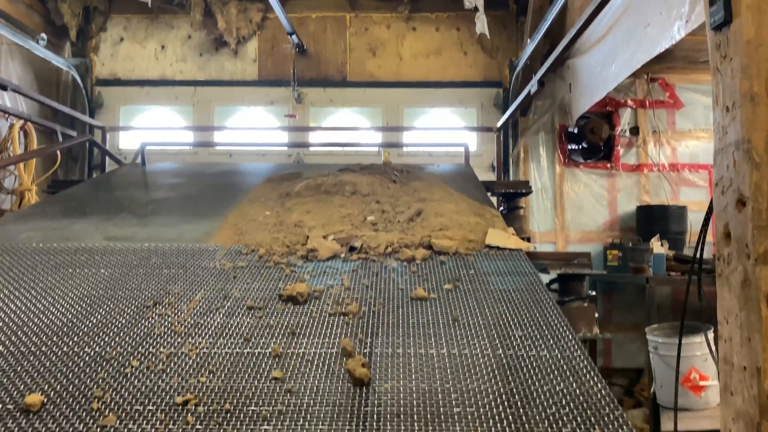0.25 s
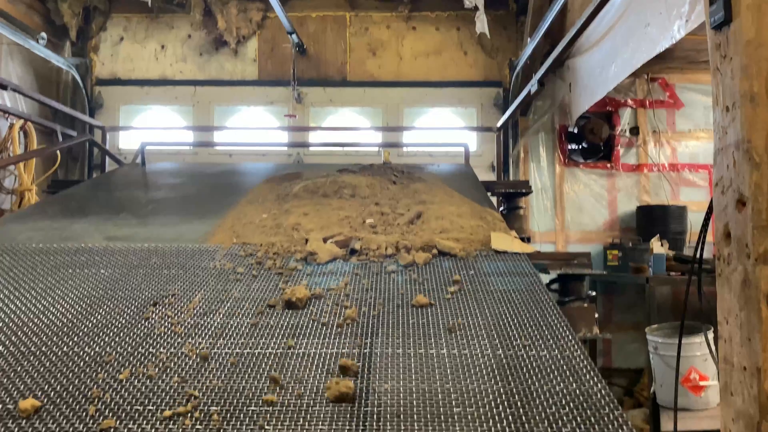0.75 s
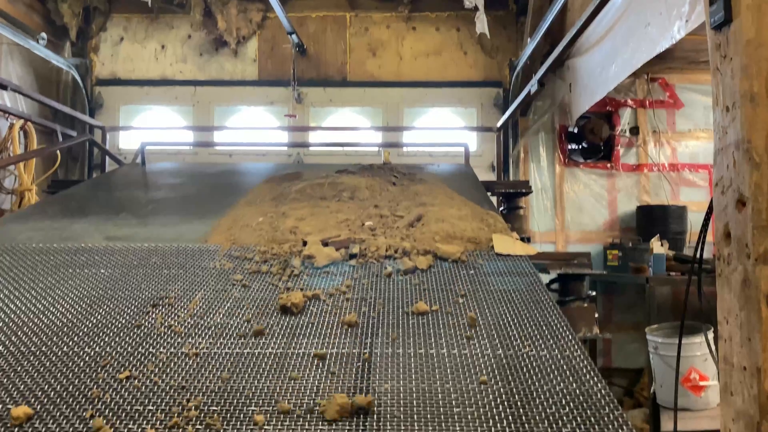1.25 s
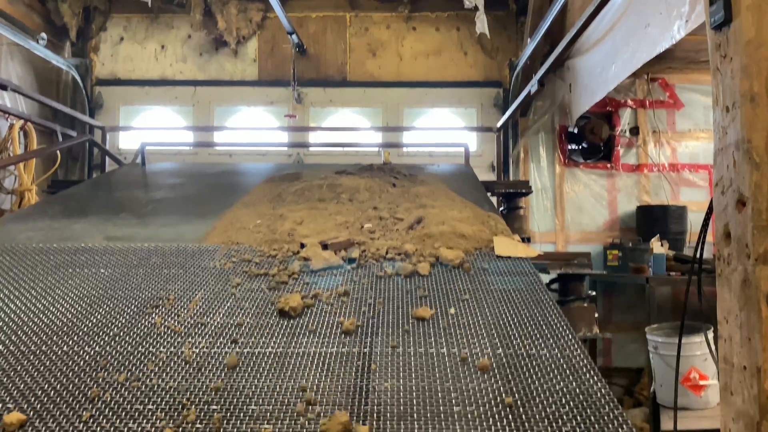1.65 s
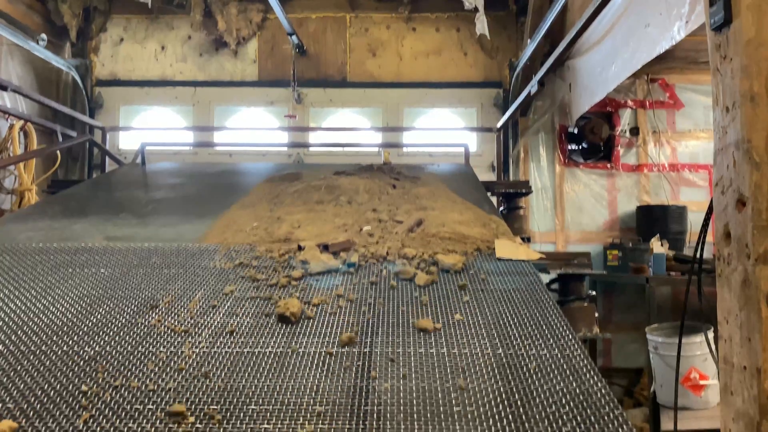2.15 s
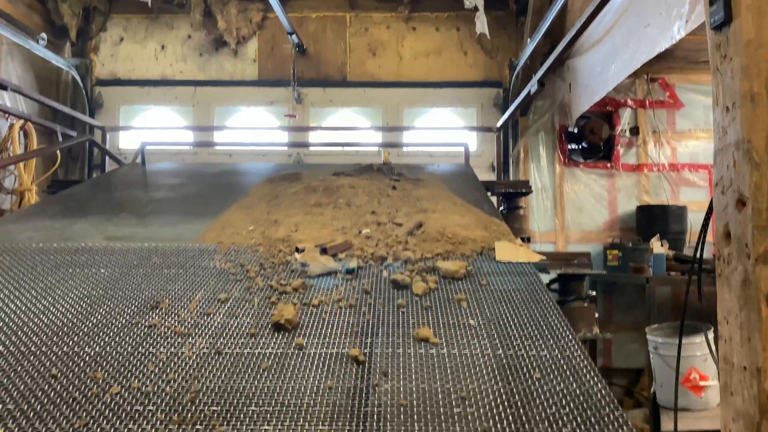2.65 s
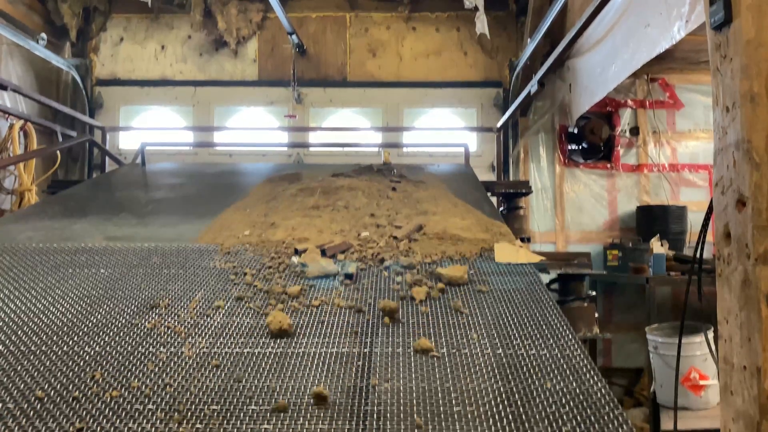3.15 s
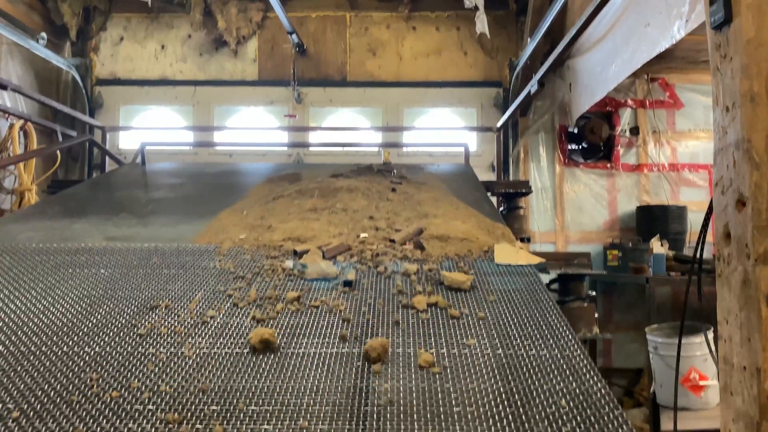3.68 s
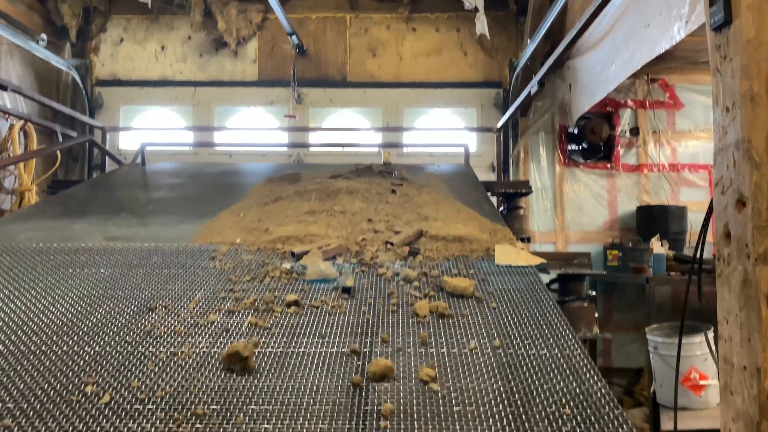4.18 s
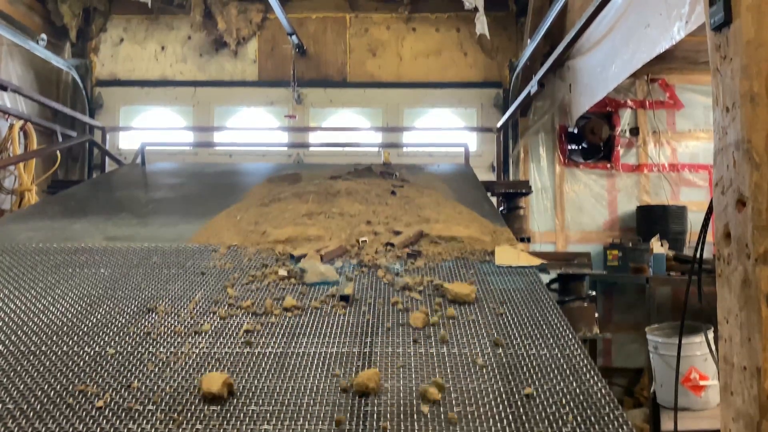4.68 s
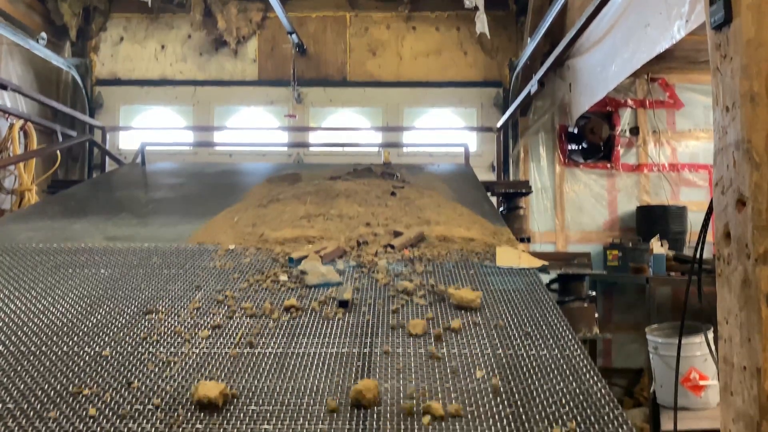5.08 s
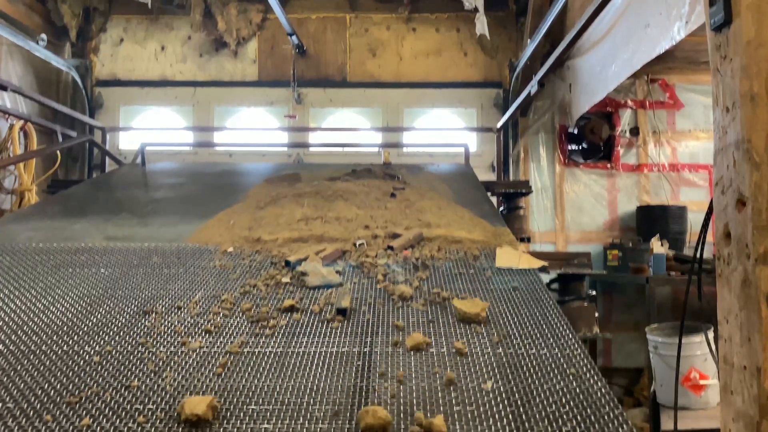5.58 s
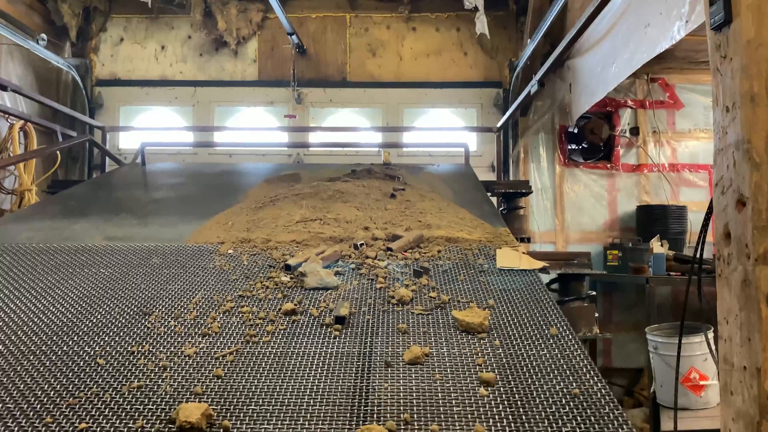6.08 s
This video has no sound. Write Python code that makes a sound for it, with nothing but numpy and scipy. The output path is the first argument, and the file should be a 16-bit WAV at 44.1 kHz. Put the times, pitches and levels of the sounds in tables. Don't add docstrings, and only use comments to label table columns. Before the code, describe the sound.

In a workshop, an unbalanced motor shakes a steel mesh screen, heard very close in stereo. A rough, low buzzing knock of about twenty-four beats a second merges with dense, gritty rattling of gravel and wires. The drone sags slightly, brightens as dirt sheds, then runs steadily. Near the end shaking stops, leaving a soft low wobble and a short fading ring.

```python
import sys
import numpy as np
from scipy import signal
from scipy.io import wavfile
from scipy.ndimage import uniform_filter1d

SR = 44100
rng = np.random.default_rng(int(sys.argv[2]) if len(sys.argv) > 2 else 0)


def volts_from_db(level):
    exponent = np.asarray(level, float) / 20
    return 10 ** exponent


def master(y):
    cut = np.clip(np.atleast_2d(y).T, -1, 1)
    pcm = np.round(cut * 32767)
    wavfile.write(sys.argv[1], SR, pcm.astype(np.int16))


N = 279153

# order (multiple of the bounce rate), left level under load/dB,
# left level once freed/dB, right level once freed/dB
KNOCK_ORDERS = [(2, -41, -41, -39), (3, -56, -51, -51), (4, -35, -30.5, -36), (5, -32.5, -31, -44),
                (6, -29, -26.5, -41), (7, -36, -34, -49), (8, -28, -31.5, -48), (9, -37, -41, -45),
                (10, -42, -38.5, -41), (12, -39, -37, -43), (13, -44, -41, -47), (14, -40, -45, -51),
                (15, -37, -39, -43), (16, -33, -34, -43), (17, -41, -39, -44), (18, -38, -34, -46),
                (19, -45, -39, -43), (20, -32, -27.5, -41), (21, -32, -32, -40), (22, -30, -31, -46),
                (23, -37, -38, -47), (24, -35, -34, -48), (26, -29.5, -28.5, -50), (27, -38, -37, -46),
                (28, -29, -42, -50), (30, -33, -33.5, -46), (36, -37, -42, -51), (38, -37, -37, -43),
                (40, -37, -41, -47), (50, -49, -37, -49)]
HALF_BLOW_ORDERS = (8, 20, 22, 24, 30, 38, 40)
# t/s, level/dB
SHAKE = [
    (0, -.3),
    (1.2, -0.44),
    (1.6, 0.6),
    (2.2, 0),
    (3.4, 1),
    (4.4, 0),
    (5.5, -0.6),
    (5.8, -1.9),
]
# t/s, turns per second above nominal
SHAFT_DRIFT = [(0, -.238), (.6, -.093), (1.05, -.57), (1.5, -.504), (2.15, .257), (2.9, .201), (3.3, .13),
               (4.15, .154), (4.5, -.002), (5.05, .023), (5.4, .114)]
# f/Hz, left level/dB per Hz, right level/dB per Hz
RATTLE_SPECTRUM = [(40, -81, -78), (81, -61.5, -65), (172, -54, -67), (244, -63.5, -64.5),
                   (523, -52.5, -70), (756, -53, -62), (1370, -56.5, -71), (2360, -59.5, -78),
                   (3770, -58, -75.5), (5040, -63, -85), (6550, -71.5, -79.5), (8440, -80, -84),
                   (9650, -77, -78), (13260, -90, -90.5)]
# f/Hz, width/Hz, left level/dB, right level/dB
MESH_MODES = [(68, 16, -3, -6), (377, 34, 6.5, 0), (520, 27, 4, 18.5), (617, 40, 6, -8), (890, 62, -0.5, 6),
              (1080, 16, 5, 18), (1440, 25, 0, 9.5), (2050, 14, 2, -7), (2232, 14, 1.5, 16),
              (2526, 39, 3.5, 13), (3900, 670, 0.5, 2), (5170, 510, 1.5, 3)]
# f/Hz, likeness 0-1
PORT_LIKENESS = [(150, 0.99), (220, 0.63), (340, 0.5), (500, 1), (680, 0.05), (950, 0.9), (1350, 1),
                 (1900, 0.66), (2400, 1), (3100, 0), (4000, 0.43), (4750, 0.5), (6500, .7), (9000, 0.93)]
# f/Hz, phase/rad
PORT_LEAD = [(100, 2.7), (130, 3.5), (170, 3.8), (200, 4.6), (280, 6.8), (520, 6.4), (750, 3.2),
             (1000, 2.3), (1700, 1.0), (2100, -1.6), (3000, -3.0), (3300, .3), (4600, 0), (5000, 2.3)]
# t/s, level/dB, f/Hz, t60/s
SPRING_SWINGS = [
    (5.8, -28, 52, 0.65),
    (5.92, -30.5, 75, 0.29),
    (6.091, -50, 111, .4),
    (6.13, -32, 55, 0.24),
    (6.27, -39, 100, 0.24),
]

SHAFT_HZ = 48.5
PATH_S = 11.88 / 44100
EDGE_HZ = 15200
FREED_S, FREEING_S = 1.79, 0.19
LOADED_ODD_DB = -5
MISSED_S, MISSED_WIDTH_S, MISSED_DB = 1.07, .33, -9
KNOCK_SHARE, LOW_SHARE, MID_SHARE, HIGH_SHARE = 0.95, 0.27, 0.52, 0.67
STOP_S, RELEASE_S = 5.815, .035
KNOCK_DROP_DB, LOW_DROP_DB, MID_DROP_DB, HIGH_DROP_DB = -5, -4, -4.5, -3.5
SHED_DB_PER_S, SHED_BASS_DB_PER_S = -28, -19
CONTACT_DB = -1.5
BLUR_RUNNING, BLUR_STOPPED = .15, 3.5


def evened(x):
    return x / np.sqrt(np.mean(abs(x) ** 2) + 1e-20)


def read(points, hz, axis=1):
    table = np.array(points, float)
    return np.interp(np.log(hz + 1), np.log(table[:, 0] + 1), table[:, axis])


def curve(rows, t, axis=1):
    table = np.array(rows, float)
    return np.interp(t, table[:, 0], table[:, axis])


def drift(count, rate_hz):
    b, a = signal.butter(2, rate_hz, fs=SR / 64)
    noise = rng.standard_normal((N // 64 + 402, count))
    return evened(signal.lfilter(b, a, noise, axis=0)[400:].T)


def stopped(t):
    return np.clip((t - STOP_S) / RELEASE_S, 0, 1)


def strength(t, share, drop_db, tail_db):
    tail_s = np.maximum(t - STOP_S - RELEASE_S, 0)
    return share * curve(SHAKE, t) + drop_db * stopped(t) + tail_db * tail_s


def blur(t):
    return BLUR_RUNNING + (BLUR_STOPPED - BLUR_RUNNING) * stopped(t)


def lead(hz):
    return read(PORT_LEAD, hz) + 2 * np.pi * PATH_S * np.maximum(hz - PORT_LEAD[-1][0], 0)


def bounces(t):
    return np.cumsum(SHAFT_HZ + curve(SHAFT_DRIFT, t)) / SR / 2 - .962


def springs():
    t, out = np.arange(N) / SR, np.zeros(N)
    for start, db, hz, t60 in SPRING_SWINGS:
        since = np.maximum(t - start, 0)
        onset = 1 - np.exp(-since / .01)
        out += volts_from_db(db - 60 * since / t60) * onset * np.sin(2 * np.pi * hz * since)
    return out * np.array([[-.5], [1.4]])


def gravel(per_s=9000, size_db=3.5, throb=0.11):
    t = np.arange(N) / SR
    chance = per_s / SR * (1 + throb * np.cos(8 * np.pi * bounces(t)))
    hits = rng.random((N, 2)).T < chance
    sizes = volts_from_db(size_db * np.minimum(rng.exponential(1, (N, 2)).T, 5))
    signs = rng.choice([-1., 1.], (N, 2)).T
    return 0.5 * evened(hits * sizes * signs) + rng.standard_normal((N, 2)).T


def rattle_colour(hz):
    ripple = evened(uniform_filter1d(rng.standard_normal(len(hz)), size=2))
    colour = np.array([read(RATTLE_SPECTRUM, hz, axis=1), read(RATTLE_SPECTRUM, hz, axis=2)]) + ripple
    for mode_hz, width, left_db, right_db in MESH_MODES:
        peak = 1 / (1 + (2 * (hz - mode_hz) / width) ** 2)
        colour += np.outer([left_db, right_db], peak)
    return colour


def rattle(patchy_db=.55, flicker_db=.9):
    hz, t, (a, b) = signal.stft(gravel(), SR, nperseg=2048, noverlap=1536)
    colour = rattle_colour(hz)
    low = strength(t, LOW_SHARE, LOW_DROP_DB, SHED_DB_PER_S)
    mid = strength(t, MID_SHARE, MID_DROP_DB, SHED_DB_PER_S)
    high = strength(t, HIGH_SHARE, HIGH_DROP_DB, SHED_DB_PER_S)
    octave = np.log2(hz + 1)[:, None]
    up = np.clip(octave - np.log2(650), 0, 1)
    top = np.clip(2 * (octave - np.log2(4800)), 0, 1)
    level = low + up * (mid - low) + top * (high - mid)
    chance = rng.standard_normal((len(t), len(hz))).T
    patches = uniform_filter1d(uniform_filter1d(chance, size=80, axis=0), size=10, axis=1)
    level += patchy_db * evened(patches)
    showers = evened(uniform_filter1d(rng.standard_normal(len(t)), size=3))
    level += flicker_db * (0.27 * up + 0.36 * top) * showers
    same = np.clip(read(PORT_LIKENESS, hz), 0, 1)[:, None]
    right = same * a * np.exp(1j * lead(hz))[:, None] + np.sqrt(1 - same ** 2) * b
    contact = (1 - 0.99 * up) * (1 - top) * CONTACT_DB * stopped(t)
    z = np.array([a, right * volts_from_db(contact)]) * volts_from_db(colour[:, :, None] + level)
    return volts_from_db(44) * signal.istft(z, SR, nperseg=2048, noverlap=1536)[1][:, :N]


def frame(jitter=.001, wander_db=1.1, wander_rad=.15, scatter=2.2):
    t, slow = np.arange(N) / SR, np.arange(N // 64 + 2) * 64 / SR
    count = len(KNOCK_ORDERS)
    freed, turns = np.clip((t - FREED_S) / FREEING_S, 0, 1), bounces(t)
    missed_db = MISSED_DB * np.exp(-((t - MISSED_S) / MISSED_WIDTH_S) ** 2)
    knock = turns + jitter * np.interp(t, slow, drift(count=1, rate_hz=10.4)[0])
    swings, sways = drift(count, rate_hz=2.5), drift(count, rate_hz=2.5)
    echoes = blur(slow) * drift(count, rate_hz=5)
    offsets, out = rng.standard_normal(count), np.zeros((2, N))
    for row, swing, sway, echo, offset in zip(KNOCK_ORDERS, swings, sways, echoes, offsets):
        order, left_loaded_db, left_freed_db, right_db = round(row[0]), row[1], row[2], row[3]
        odd = order % 2
        loose = np.sqrt(np.minimum(order - 1.7, 20) / 10)
        shift = 2.1 + 1.7 * odd if order < 20 else 3.5 - odd
        late = -1 - np.clip((order - 4) / 4, 0, 1) * shift
        cycles = order * (knock if order > 2 else turns)
        phase = 2 * np.pi * cycles + late + np.interp(t, slow, wander_rad * loose * sway + echo)
        fade_db = 1.7 * (order > 9) * blur(t) - missed_db * (order in HALF_BLOW_ORDERS)
        size = np.sqrt(2) * volts_from_db(wander_db * loose * np.interp(t, slow, swing) - fade_db)
        air = scatter * offset * (10 < order < 20 or order > 22) - lead(order * SHAFT_HZ / 2)
        left_db = left_loaded_db + freed * (left_freed_db - left_loaded_db)
        out[0] += size * volts_from_db(left_db) * np.cos(phase + air)
        out[1] += size * volts_from_db(right_db + (1 - freed) * LOADED_ODD_DB * odd) * np.cos(phase)
    gain_db = 0.25 + strength(t, KNOCK_SHARE, KNOCK_DROP_DB, SHED_BASS_DB_PER_S)
    return out * volts_from_db(np.array([gain_db, gain_db + CONTACT_DB * stopped(t)]))


def scene():
    return springs() + rattle() + frame()


def band_limit(x):
    return signal.sosfilt(signal.butter(12, 16510, fs=SR, output="sos"), x)


def record(dry):
    edge = signal.firwin(511, EDGE_HZ, window=("kaiser", 9), fs=SR)
    mix = signal.oaconvolve(dry, edge[None], "same")
    return band_limit(mix)


dry = scene()
out = record(dry)
master(out)
```